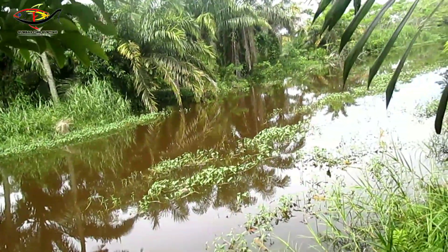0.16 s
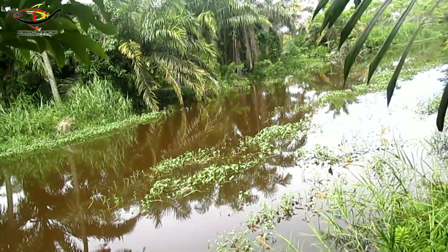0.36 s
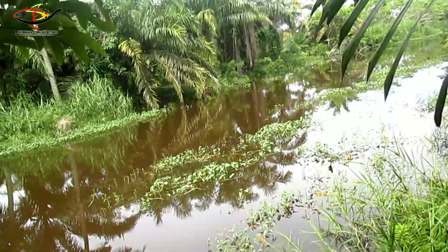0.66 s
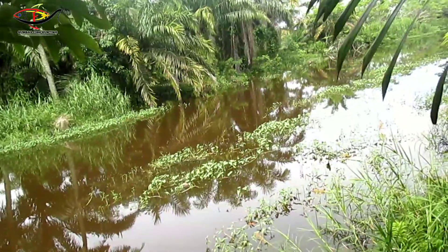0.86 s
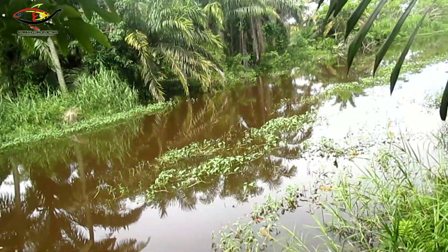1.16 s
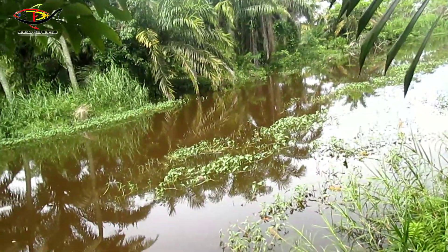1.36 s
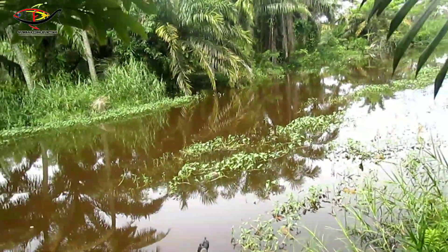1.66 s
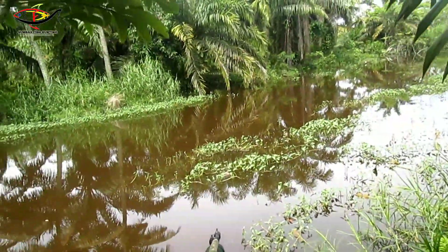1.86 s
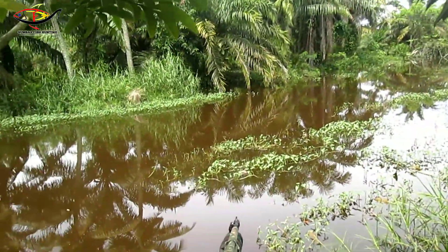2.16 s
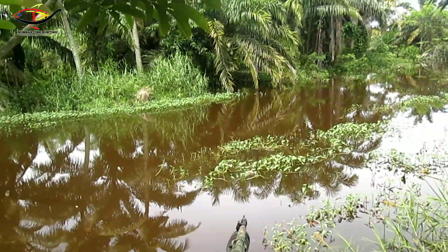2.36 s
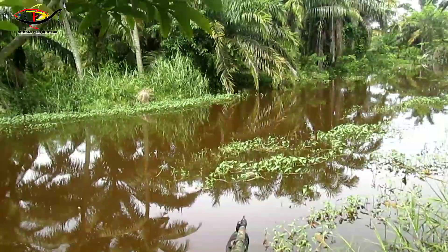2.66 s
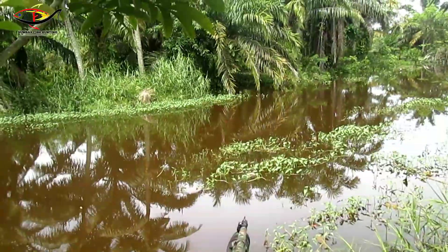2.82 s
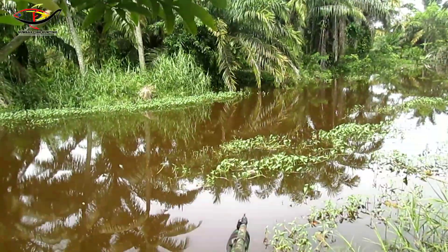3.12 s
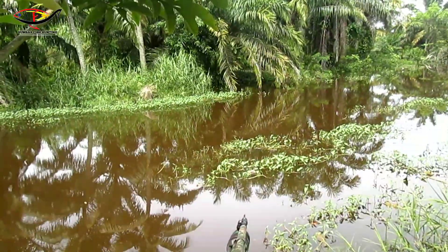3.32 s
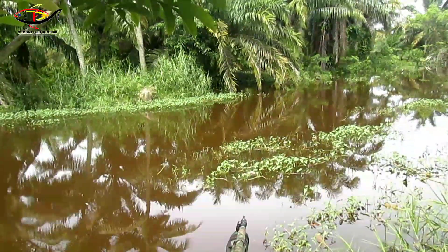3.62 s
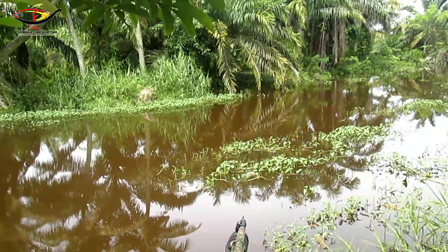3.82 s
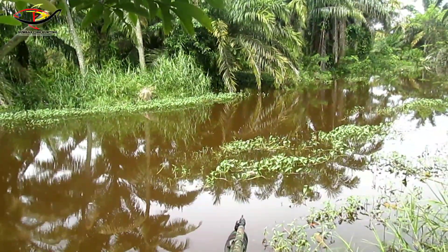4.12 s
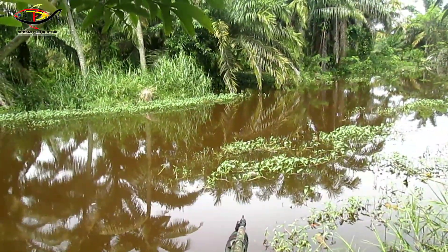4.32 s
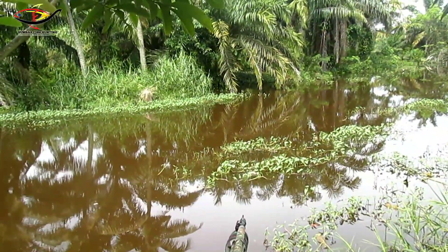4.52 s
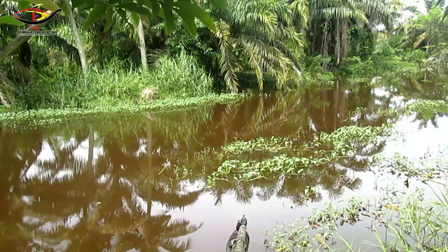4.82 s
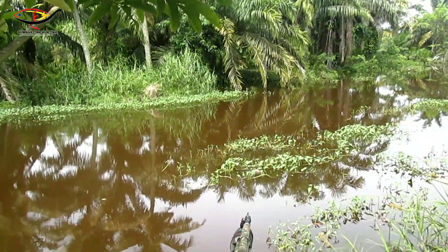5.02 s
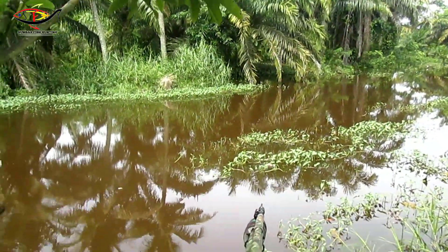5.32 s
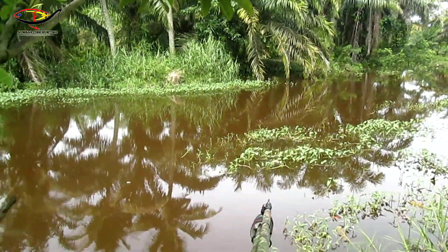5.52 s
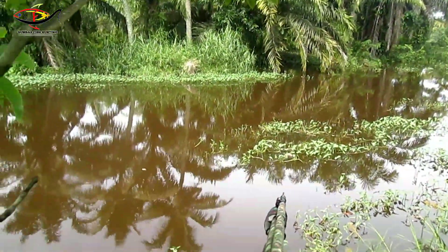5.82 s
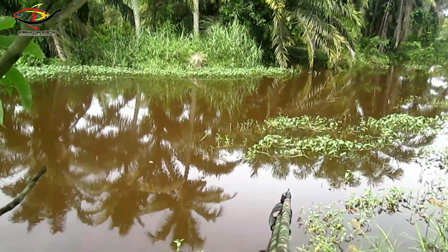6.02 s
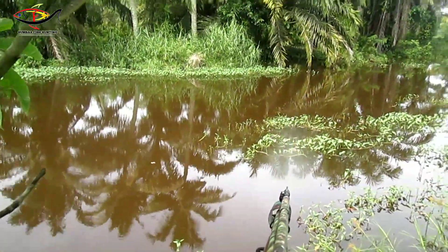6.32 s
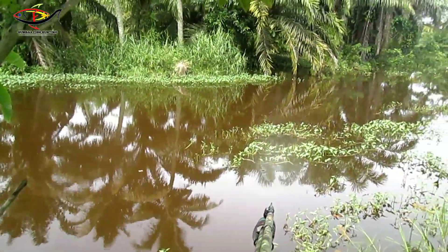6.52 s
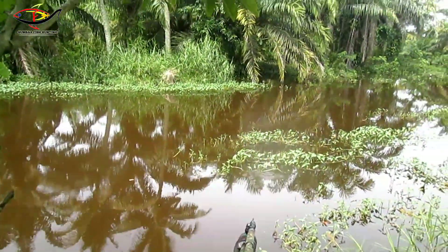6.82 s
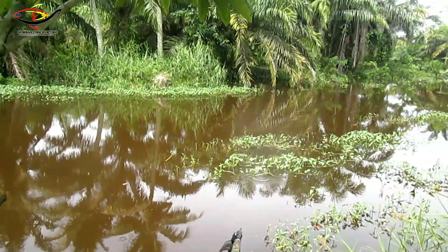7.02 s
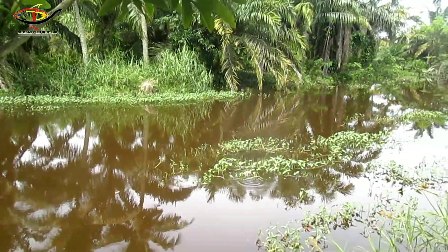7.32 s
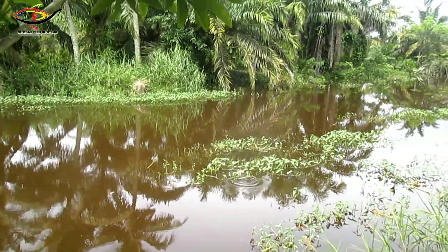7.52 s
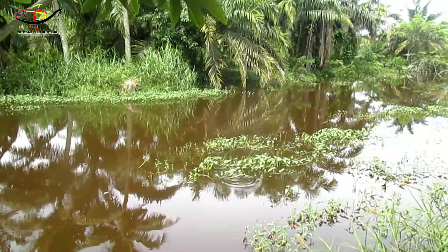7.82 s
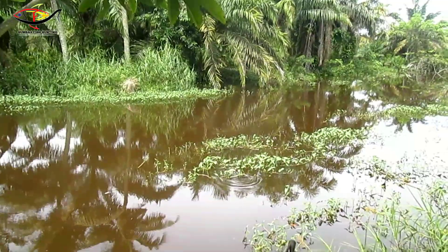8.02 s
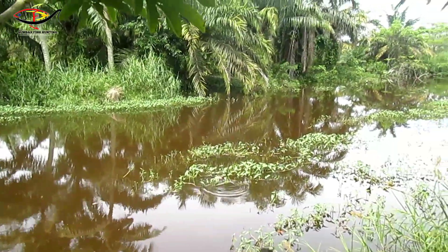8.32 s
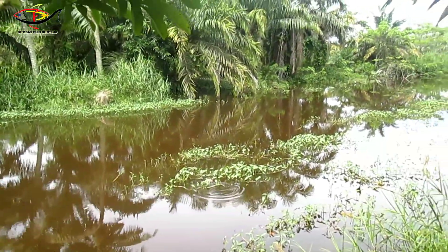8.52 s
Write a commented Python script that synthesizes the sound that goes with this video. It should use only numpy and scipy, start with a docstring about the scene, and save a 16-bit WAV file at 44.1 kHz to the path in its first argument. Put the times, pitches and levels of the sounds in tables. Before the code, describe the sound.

Beside a forest river, crickets pulse and insects hiss over the low rumble of a distant engine. An air rifle gives a few close knocks as it is handled. Birds begin to chirp and whistle, and leaves brush softly. The rifle fires once with a sharp metallic snap that overloads the microphone, and the pellet plops into the water. The background dips, then slowly returns as the birds keep calling.

```python
"""Air rifle by a forest river

Crickets pulse and bush crickets hiss among the palms; birds call from the far bank over the rumble
of a distant engine. An air rifle knocks as it is brought to aim, then its spring lets go and the
piston slams home; the pellet smacks into the slow river with a plop. The shot overloads the
microphone, whose gain control ducks and slowly recovers."""
import sys
import numpy as np
from scipy import signal
from scipy.fft import rfft, irfft, next_fast_len
from scipy.io import wavfile

SR = 44100
rng = np.random.default_rng(int(sys.argv[2]) if len(sys.argv) > 2 else 0)


def unload_audio(sound):
    """Save the sound as a 16-bit wav file, at the path given as the first command line argument."""
    columns = np.transpose(np.atleast_2d(sound))
    # keep every value between -1 and 1, then stretch to whole-number steps
    steps = np.round(np.clip(columns, -1, 1) * 32767)
    wavfile.write(sys.argv[1], SR, steps.astype(np.int16))


N = 382347
TIME = np.arange(N) / SR

# bright hiss of spray, muzzle air and spring scrape: (frequency [Hz], density [dB])
HISS_SPECTRUM = [(200, -6.5), (1400, -5.5), (2500, -11.5), (4000, -11), (5200, -6.5), (8300, -5),
                 (10500, -8), (15500, -24)]


def from_db(db):
    """Decibels to gain."""
    return 10 ** (np.asarray(db) / 20)


def rms_one(x):
    """Scale to unit power."""
    return x / np.sqrt(np.mean(x ** 2) + 1e-20)


def cycles(rate):
    """Phase in radians of a changing rate in Hz."""
    return 2 * np.pi * np.cumsum(rate) / SR


def shaped(gain_at):
    """Unit noise whose spectrum follows a function of frequency."""
    size = next_fast_len(N)
    hz = np.arange(size // 2 + 1) * SR / size + 1e-6
    return rms_one(irfft(rfft(rng.standard_normal(size)) * gain_at(hz), size)[:N])


def noise(spectrum):
    """Unit noise with a (frequency [Hz], density [dB]) spectrum that rolls off beyond its ends."""
    f, db = np.transpose(spectrum)
    return shaped(lambda hz: from_db(np.interp(np.log(hz), np.log(f), db))
                  * np.minimum(1, np.minimum(hz / f[0], f[-1] / hz)) ** 2)


def band(centre_hz, width_hz):
    """Unit noise in one steep resonance; centred on zero it is a slow drift."""
    return shaped(lambda hz: 1 / (1 + (2 * (hz - centre_hz) / width_hz) ** 2 / 2) ** 2)


def decay(start, t60, rise_s=0.00023):
    """An envelope with a quick attack that dies away."""
    age = np.maximum(TIME - start, 0)
    return (1 - np.exp(-age / rise_s)) * np.exp(-np.log(1000) * np.minimum(age / t60, 10))


def swells(rows):
    """Smooth rises and falls from (middle [s], length [s], level [dB]) rows."""
    return sum(from_db(db) * np.cos(np.pi * np.clip((TIME - s) / length, -.5, .5))
               for s, length, db in rows)


def ring(start, modes, rise_s=.0001):
    """Struck modes, each a dying sine; a soft contact builds them up more slowly."""
    out, first = np.zeros(N), int(start * SR)
    t = TIME[:min(SR // 2, N - first)]
    sines = sum(from_db(db) * np.exp(-np.log(1000) * t / t60) * np.sin(2 * np.pi * hz * t)
                for hz, db, t60 in modes)
    out[first:first + len(t)] = (1 - np.exp(-t / rise_s)) * sines
    return out


def bursts(rows):
    """Each burst is a dull slap with a longer tail of bright hiss."""
    # the slap's tone: (frequency [Hz], density [dB])
    slap_spectrum = [(80, -5), (400, 2.5), (1300, 8.5), (2200, -5), (5000, -0.5), (9000, -20),
                     (15500, -24.5)]
    slaps = sum(from_db(slap_db) * decay(s, .007, rise) for s, slap_db, _, _, rise in rows)
    hisses = sum(from_db(hiss_db) * decay(s, t60, rise) for s, _, hiss_db, t60, rise in rows)
    return slaps * noise(slap_spectrum) + hisses * noise(HISS_SPECTRUM)


def sing(notes, waver):
    """Near-sine notes that bend through three pitches; wide glides waver most."""
    out, wobble = np.zeros(N), band(0, 200)
    for start, length, first_hz, middle_hz, last_hz, db in notes:
        at = np.flatnonzero((TIME >= start) & (TIME < start + length))
        progress = np.linspace(0, 1, len(at))
        pitch = np.polyval(np.polyfit([0, .5, 1], [first_hz, middle_hz, last_hz], 2), progress)
        envelope = from_db(db) * np.sqrt(np.abs(np.sin(np.pi * progress)))
        out[at] += envelope * np.sin(cycles(pitch + waver * np.ptp(pitch) * wobble[at]))
    return out


def forest(x, t60, wet_db, dull_hz=9500):
    """Trunks and leaves scatter a sound into a dense dying tail that lacks the highest treble."""
    t = TIME[:SR]
    tail = rng.standard_normal(SR) * np.exp(-np.log(1000) * t / t60) * (1 - np.exp(-t / 0.0029))
    tail = signal.sosfilt(signal.butter(2, dull_hz, fs=SR, output="sos"), tail)
    return x + from_db(wet_db) * signal.fftconvolve(x, tail / np.linalg.norm(tail))[:N]


def rumble():
    """A bed of far noise with the unsteady hum of an engine, which fades a little."""
    # distant rumble and forest air: (frequency [Hz], density [dB])
    air_spectrum = [(12, -48.5), (20, -16.5), (87, 0), (129, -5.5), (161, -10.5), (195, -11), (428, -15.5),
                    (666, -17.5), (1260, -24), (2270, -32), (3440, -38), (3890, -39), (4850, -43.5),
                    (5350, -43), (7000, -49.5), (9100, -76), (15400, -120)]
    # bands of engine hum: (centre [Hz], width [Hz], level [dB])
    hum_bands = [(40, 4, -54), (59.4, 2.4, -53.5), (80, 13, -48.5), (157.6, 4, -53.5)]
    # the engine's fade: (time [s], gain [dB])
    fade = [(0, 3.5), (1, 4), (2.8, 0.5), (3.6, -1), (8.67, -2.5)]
    hum = sum(from_db(db) * band(hz, width) for hz, width, db in hum_bands)
    hum_gain = from_db(np.interp(TIME, *np.transpose(fade)))
    return from_db(-41.5) * noise(air_spectrum) + hum_gain * hum


def bush_crickets():
    """Many far raspers merge into a hiss; one holds a thin high whine."""
    # the massed rasping: (frequency [Hz], density [dB])
    chorus_spectrum = [(4000, -25), (6800, -15), (8000, -2.5), (8750, -8), (9400, 0.5), (10150, -2.5),
                       (10450, -15), (11000, -18.5), (12200, -24.5), (13000, -23), (15500, -31.5)]
    hiss = from_db(-61.0 + 0.69 * band(0, 6.5)) * noise(chorus_spectrum)
    whine = np.sin(2 * np.pi * 11795 * TIME + 0.57 * band(0, 30)) + .3 * band(11820, 70)
    return hiss + from_db(-80) * rms_one(whine)


def crickets():
    """Crickets ring their wings in quick chirps, each at its own pitch, loosely keeping one beat."""
    # near crickets: (pitch [Hz], level [dB], steady tone under the chirps [ratio])
    singers = [(7370, -75.5, .5), (7760, -75, 0.28), (7940, -69.5, 0.23), (8170, -61, 1), (8370, -64, 0.63),
               (8470, -68, .4)]
    # their common beat: (time [s], rate [chirps/s], stray from the beat [rad])
    tempo = [(0, 16.6, 0.22), (1.5, 16.9, 0.55), (2.5, 18.3, 2), (4, 17, 1.8), (6, 17.2, 1.5),
             (8.67, 15, 1.37)]
    times, rate, stray = np.transpose(tempo)
    beat, out = cycles(np.interp(TIME, times, rate)), 0
    for hz, db, steady in singers:
        stroke = beat + np.interp(TIME, times, stray) * band(0, 1.8)
        chirps = steady + (.5 + .5 * np.cos(stroke)) ** 1.5
        wing = np.sin(2 * np.pi * hz * TIME + 1.2 * band(0, 55)) + 0.74 * band(hz, 190)
        out = out + from_db(db + 1.1 * band(0, 3.9)) * rms_one(chirps * wing)
    return out


def low_cricket():
    """Swelling phrases of raspy pulses; each phrase climbs in pitch to its middle, each pulse falls."""
    # the lower cricket's phrases: (middle [s], level [dB])
    phrases = [(.09, -65.5), (.82, -66), (1.65, -64.5), (2.63, -66), (3.46, -67), (4.31, -67),
               (5.06, -66.5), (5.95, -67.5), (7.22, -66.5), (7.99, -69)]
    phrase_s, climb_hz_per_s, pulses_per_s = .41, 1500, 22
    middles = np.array(phrases)[:, 0]
    nearest_middle = middles[np.searchsorted((middles[1:] + middles[:-1]) / 2, TIME)]
    lead_s = np.clip(nearest_middle - TIME, 0, phrase_s)
    stroke = (pulses_per_s * TIME + 0.11 * band(0, 3.5)) % 1
    pitch = 5040 - 400 * stroke - climb_hz_per_s * lead_s
    pulses = np.sin(np.pi * stroke) ** 2 * band(0, 380) * np.sin(cycles(pitch))
    song = from_db(-2) * swells([(s, phrase_s, db) for s, db in phrases]) * rms_one(pulses)
    return forest(song, t60=0.23, wet_db=-2) + from_db(-71.5) * band(4450, 800)


def far_warblers(count):
    """Short random notes, washed in echo, join in and then slowly recede."""
    entry_s, swell_s, fade_db_per_s = 4.3, 0.85, 1.2
    start, length, pitch, bend = rng.random((count, 4)).T
    hz, slide = 1550 * 1.6 ** pitch, 0.286 * (bend - .5)
    notes = np.column_stack([start * TIME[-1], 0.0197 + 0.0296 * length,
                             hz * (1 - slide), hz, hz * (1 + slide), np.zeros(count)])
    age = np.maximum(TIME - entry_s, 0)
    presence = np.minimum(age / swell_s, 1) * from_db(-57 - fade_db_per_s * age)
    return presence * rms_one(forest(sing(notes, waver=.2), t60=0.45, wet_db=-2))


def two_note_bird():
    """A falling note answered by a rising one, every two seconds or so."""
    # each call: (time [s], level [dB])
    calls = [(3.138, -57), (5.443, -56), (7.608, -54.5)]
    # its notes: (delay [s], length [s], start [Hz], middle [Hz], end [Hz], gain [dB])
    pair = [(0, .02, 4530, 4270, 4100, -1.5), (0.054, .028, 3330, 3760, 3920, 2.5)]
    notes = [(s + delay, length, first, middle, last, db + note_db)
             for s, db in calls for delay, length, first, middle, last, note_db in pair]
    return forest(sing(notes, waver=0.13), t60=.45, wet_db=-5.5)


def chatterer():
    """A bird's harsh arched notes, whose pitch sinks quickly at first, then levels out."""
    # the run of notes: (time [s], level [dB])
    chatter = [(3.72, -56.5), (3.776, -53), (3.85, -57), (3.94, -54.5), (4.02, -52), (4.09, -61),
               (4.211, -52.5), (4.32, -57), (4.439, -56.5), (4.55, -61), (4.67, -59)]
    start_hz, floor_hz, sink_s = 4110, 2545, .53
    times, levels = np.transpose(chatter)
    pitches = floor_hz + (start_hz - floor_hz) * np.exp(-(times - times[0]) / sink_s)
    notes = [(s, .045, hz * .86, hz * 1.06, hz * .88, db) for s, hz, db in zip(times, pitches, levels)]
    harsh = sing(notes, waver=.25) * band(0, 750)
    return from_db(-1.5) * forest(harsh, t60=0.93, wet_db=1.5)


def whistlers():
    """Each bird's whistle swells quickly, glides to its held pitch, then sags a little as it fades."""
    # whistles: (time [s], length [s], start pitch [Hz], held pitch [Hz], glide [s], level [dB])
    whistles = [(3.335, 0.21, 3950, 3325, .026, -62.5), (4.80, .11, 2790, 2266, .062, -49.5),
                (5.02, .135, 2537, 3546, .05, -47), (5.783, 0.053, 3225, 3170, .03, -62),
                (6.92, .15, 3120, 3140, .03, -60)]
    waver, sag_hz_per_s = .14, 250
    out, wobble = np.zeros(N), band(0, 200)
    for start, length, first_hz, held_hz, glide_s, db in whistles:
        at = np.flatnonzero((TIME >= start) & (TIME < start + length))
        age = TIME[at] - start
        glide_hz = (first_hz - held_hz) * np.exp(-(age / glide_s) ** 2)
        pitch = held_hz + glide_hz * (1 + waver * wobble[at]) - sag_hz_per_s * age
        out[at] += from_db(db) * np.sin(np.pi * (age / length) ** 0.8) * np.sin(cycles(pitch))
    return forest(out, t60=0.64, wet_db=-1)


def near_warbler():
    """Short slurs of one length slide up or down through their pitch."""
    # the song: (time [s], pitch [Hz], slide [octaves], level [dB])
    slurs = [(.55, 2660, -0.52, -57), (4.93, 1730, .13, -54), (5.03, 2220, -.3, -52),
             (5.10, 1456, -0.13, -52), (5.19, 2110, -.25, -52), (5.495, 2080, .38, -52),
             (5.64, 2140, .28, -51.5), (5.94, 2180, .2, -54.5), (6.035, 1800, -.2, -51),
             (6.485, 2395, -0.13, -44), (6.795, 1680, -0.203, -49), (6.905, 2436, -0.32, -43.5),
             (7.015, 1760, -0.26, -46), (7.20, 1850, -0.23, -50), (7.243, 2270, .13, -47),
             (7.368, 1713, -0.24, -45.5), (7.535, 1880, 0.23, -45), (7.572, 2300, -0.22, -46),
             (7.90, 2380, .25, -50), (8.0, 1710, -.23, -53), (8.17, 1474, .15, -53),
             (8.28, 1493, 0.22, -47.5), (8.445, 2370, -.15, -47.5), (8.578, 1925, .24, -50)]
    slur_s = .034
    notes = [(s, slur_s, hz * 2 ** (-slide / 2), hz, hz * 2 ** (slide / 2), db)
             for s, hz, slide, db in slurs]
    return forest(sing(notes, waver=.14), t60=.5, wet_db=-3)


def handling():
    """Each knock on the rifle is a click and the ring of its body; the grip rumbles and leaves brush."""
    # knocks on the rifle: (time [s], body [dB], click [dB], click t60 [s])
    knocks = [(1.7505, -22, -37, 0.083), (1.916, -31.5, -33.5, .1), (1.927, -32, -43, 0.066),
              (1.9585, -30.5, -35.5, 0.062), (2.386, -24, -29, 0.046), (7.664, -37, -44, .025)]
    # the rifle body's modes: (frequency [Hz], level [dB], t60 [s])
    body_modes = [(516, -0.5, 0.056), (642, -5.5, 0.066), (875, 4, 0.032), (954, -5, 0.031),
                  (1160, -8, .03), (2650, -2, 0.012), (4370, -18, 0.036)]
    # the click's tone: (frequency [Hz], density [dB])
    click_spectrum = [(300, 0.5), (900, 0), (1800, -2.5), (3500, -11), (5000, -7.5), (8000, -14),
                      (12000, -21), (15500, -37)]
    # hands tightening on the grip: (middle [s], length [s], level [dB])
    squeezes = [(6.16, 0.27, -41), (8.1, .12, -48)]
    # leaves brushing as the shooter moves: (middle [s], length [s], level [dB])
    rustles = [(.78, .2, -68), (1.14, .14, -66), (2.92, .55, -65.5), (3.5, 0.28, -69.5), (5.52, 0.93, -60),
               (8.67, .3, -69)]
    # the leaves' tone: (frequency [Hz], density [dB])
    leaf_spectrum = [(1200, 3), (4500, 3), (6500, -2), (9000, -5), (12000, -16.5), (15500, -19)]
    click = noise(click_spectrum)
    rings = sum(from_db(db) * ring(s, body_modes, rise_s=0.0026) for s, db, _, _ in knocks)
    clicks = sum(from_db(db) * click * decay(s, t60, rise_s=0.0041) for s, _, db, t60 in knocks)
    movement = swells(squeezes) * band(95, 90) + swells(rustles) * noise(leaf_spectrum)
    return forest(rings, t60=0.27, wet_db=-15.0) + forest(clicks, t60=1.0, wet_db=-6.5) + movement


def splash():
    """The pellet's slap on the water, its spray and the plop of closing air cavities."""
    # the pellet enters, its cavity closes: (time [s], slap [dB], spray [dB], spray t60 [s], rise [s])
    impacts = [(6.373, -8.5, -18.5, 0.18, 0.0017), (6.417, -3.5, -18, 0.03, 0.00075)]
    # ringing cavities: (time [s], pitch [Hz], level [dB], t60 [s])
    bubbles = [(6.37, 230, -8, 0.015), (6.4162, 1710, -11, 0.027)]
    plops = sum(ring(s, [(hz, db, t60)], rise_s=0.00032) for s, hz, db, t60 in bubbles)
    return forest(bursts(impacts) + plops, t60=0.67, wet_db=-21.5)


def shot():
    """The rifle kicks, the action clacks, the spring scrapes, then the piston's slam rings the steel."""
    # pressure pulse as the spring is released: (time [s], level [dB], length of the push [s])
    kick = (6.2313, 6.3, 0.00098)
    # the action clacks and rattles: (time [s], ring [dB], crack [dB], crack t60 [s])
    clacks = [(6.231, -12, -4.5, 0.018), (6.233, 3, -22, 0.016), (6.2372, -20.5, -14.5, 0.11)]
    # modes of barrel and stock: (frequency [Hz], level [dB], t60 [s])
    barrel_modes = [(134.5, -26, 0.018), (254, -11, 0.04), (417, -16.5, .025), (1030, -3, 0.013),
                    (1366, -2, 0.017), (2465, -16, 0.028), (2950, -12, 0.0083)]
    # the crack's tone: (frequency [Hz], density [dB])
    crack_spectrum = [(100, -2), (1400, 8), (2200, -4.5), (3000, -5.5), (4000, -11.5), (5500, -1.5),
                      (9000, -5), (12000, -17), (15500, -31.5)]
    # the spring scrapes as it uncoils: (time [s], level [dB], t60 [s])
    uncoiling = (6.241, -14.5, .09)
    # the piston slams home and rebounds, air hisses from the muzzle:
    # (time [s], slap [dB], hiss [dB], hiss t60 [s], rise [s])
    slams = [(6.2505, 9, -3, 0.06, .0004), (6.262, -2, -16, 0.088, 0.00036),
             (6.288, -24, -23.5, 0.15, .003)]
    # modes of the steel spring and barrel: (frequency [Hz], level [dB], t60 [s])
    steel_modes = [(4790, -12.5, 0.08), (5020, -15, .06), (6221, -14, .07), (6732, -18, .07),
                   (8500, -10.5, 0.07)]
    kick_s, kick_db, push_s = kick
    progress = np.maximum(TIME - kick_s, 0) / push_s
    pulse = from_db(kick_db) * (progress > 0) * (1 - progress) * np.exp(-np.minimum(progress, 50))
    crack = noise(crack_spectrum)
    action = sum(from_db(ring_db) * ring(s, barrel_modes) + from_db(crack_db) * crack * decay(s, t60)
                 for s, ring_db, crack_db, t60 in clacks)
    scrape_s, scrape_db, scrape_t60 = uncoiling
    scrape = from_db(scrape_db) * decay(scrape_s, scrape_t60) * noise(HISS_SPECTRUM)
    report = scrape + bursts(slams) + ring(slams[0][0], steel_modes)
    return (forest(pulse + action, t60=0.56, wet_db=-29.0)
            + forest(report, t60=0.99, wet_db=-21, dull_hz=13030))


def scene():
    """Everything heard from the bank, in mono."""
    bed = rumble() + crickets() + bush_crickets() + low_cricket()
    birds = whistlers() + two_note_bird() + near_warbler() + chatterer() + far_warblers(count=200)
    return (bed + birds + handling() + shot() + splash())[None]


def gain_control(x, threshold_db, depth_db, release_db_per_s, attack_s):
    """A loud sound pulls the gain down quickly; it climbs back at a steady pace."""
    over_db = np.clip(20 * np.log10(np.abs(x[0]) + 1e-9) - threshold_db, 0, depth_db)
    held_db = np.maximum.accumulate(over_db + release_db_per_s * TIME) - release_db_per_s * TIME
    pole = np.exp(-1 / (attack_s * SR))
    return x * from_db(-signal.lfilter([1 - pole], [1, -pole], held_db))


def record(dry):
    """A narrow dip in the microphone's response, gain control, overload and a steep top cut."""
    notch_hz, cutoff_hz = 3950, 15450
    coloured = signal.lfilter(*signal.iirnotch(notch_hz, Q=30, fs=SR), dry)
    ducked = gain_control(coloured, threshold_db=-14.5, depth_db=14.5,
                          release_db_per_s=6.5, attack_s=0.02)
    clipped = np.clip(ducked, -.87, .87)
    return signal.sosfilt(signal.ellip(10, .1, 80, cutoff_hz, fs=SR, output="sos"), clipped)


dry = scene()
out = record(dry)
unload_audio(out)
```